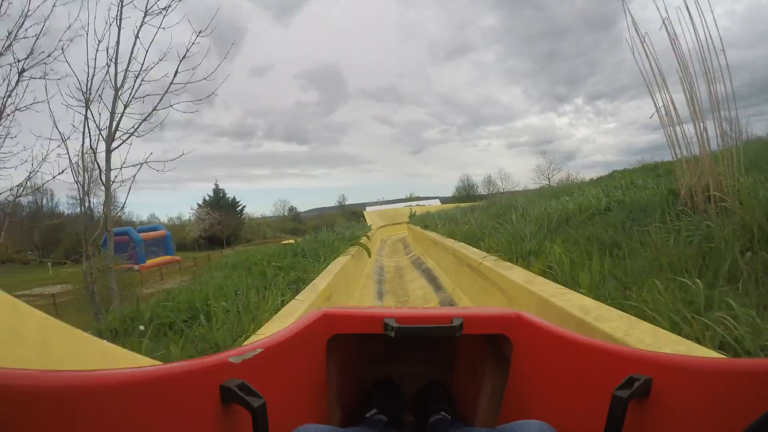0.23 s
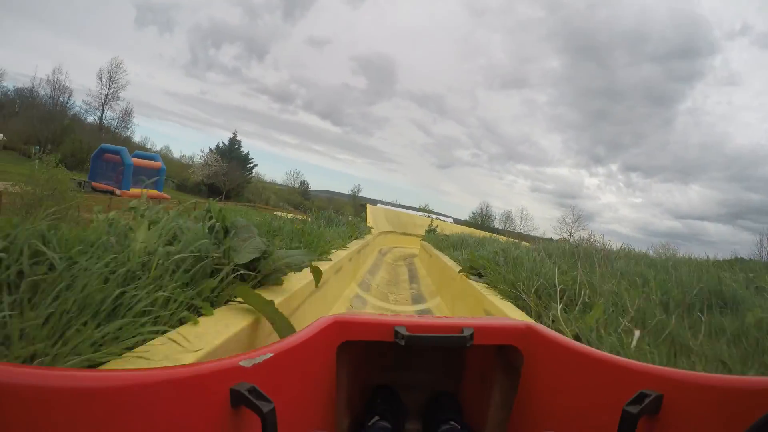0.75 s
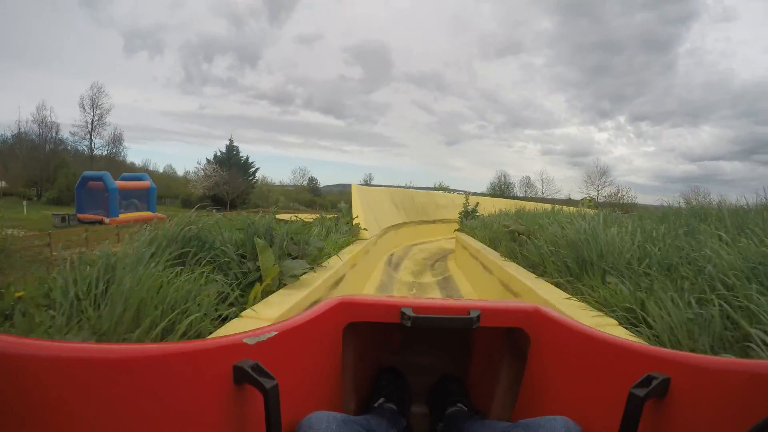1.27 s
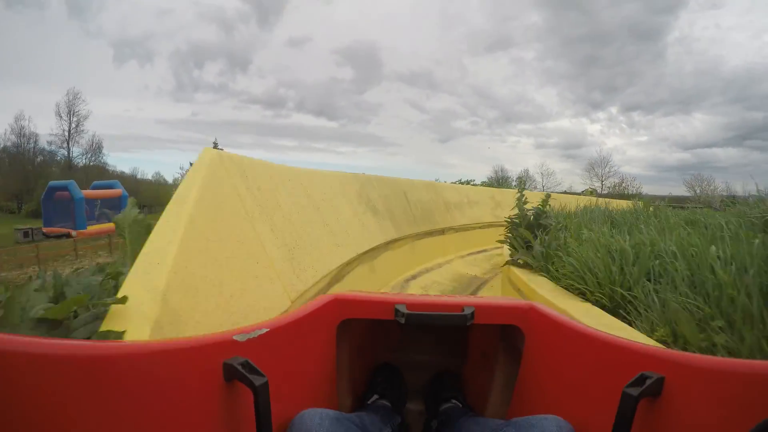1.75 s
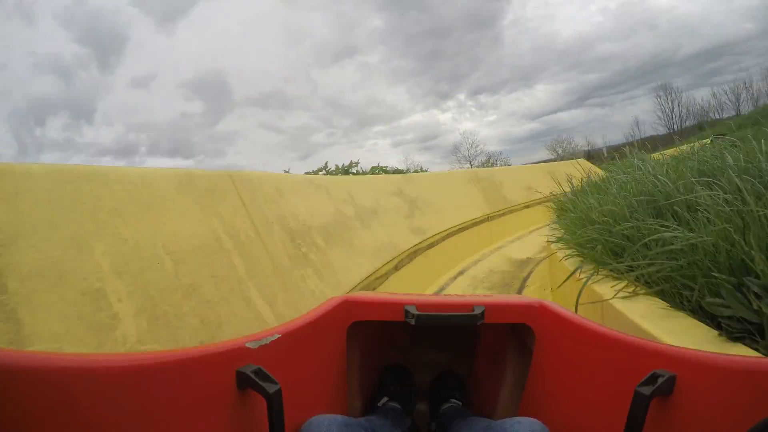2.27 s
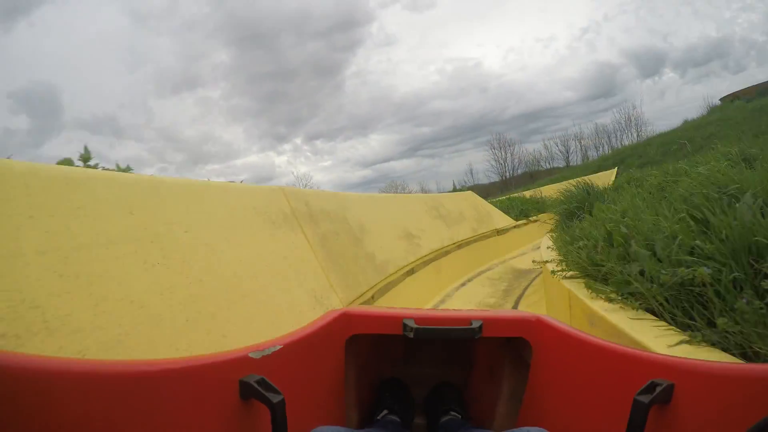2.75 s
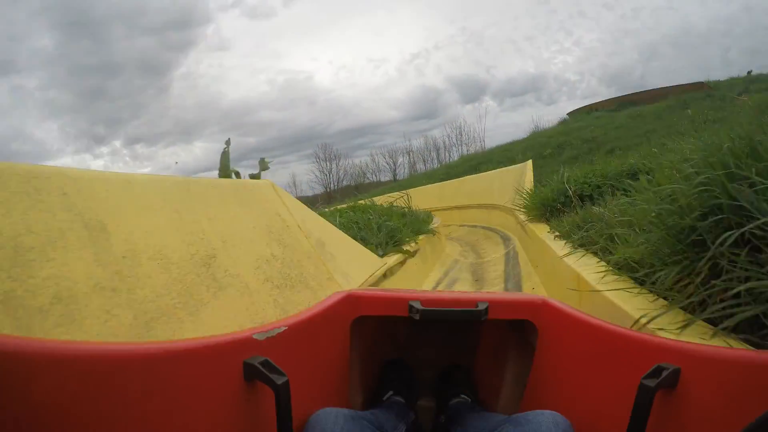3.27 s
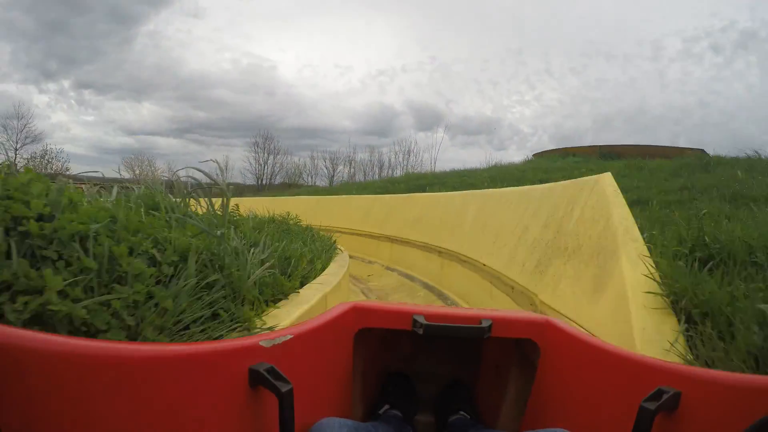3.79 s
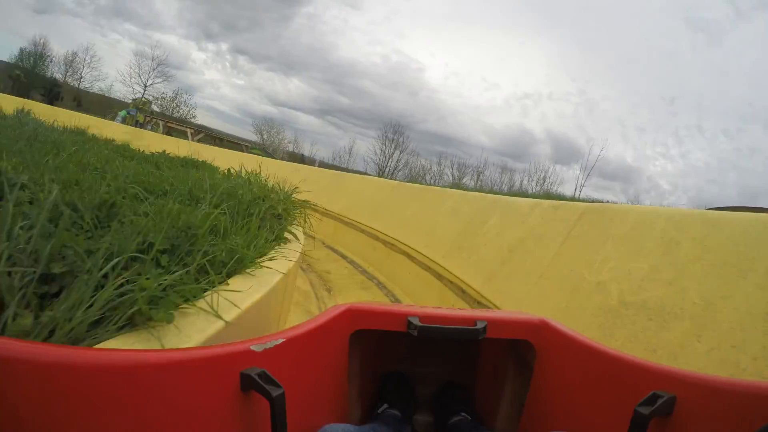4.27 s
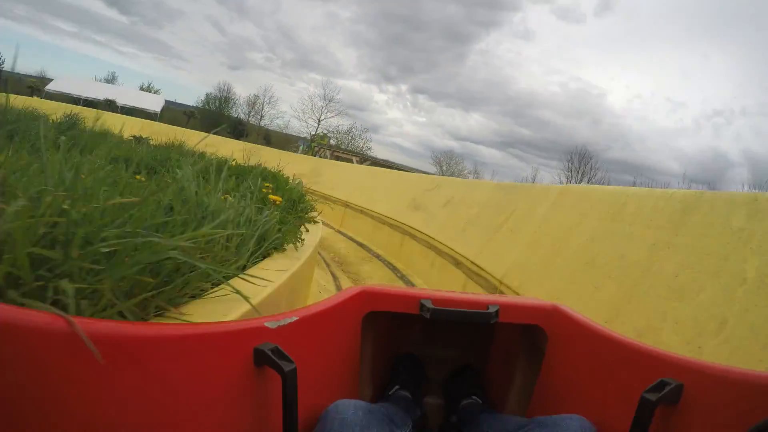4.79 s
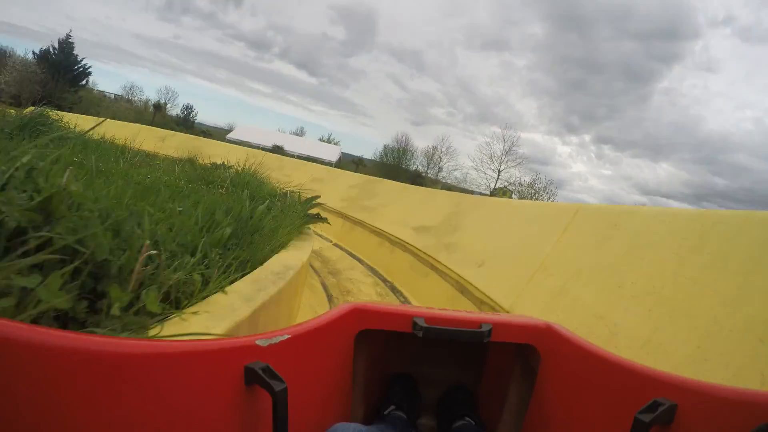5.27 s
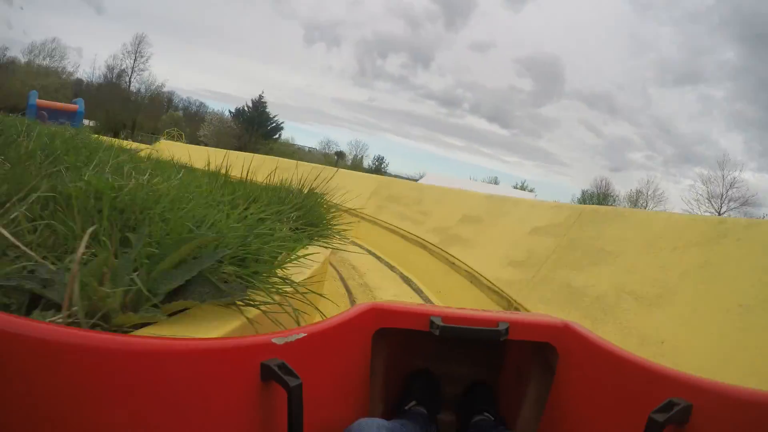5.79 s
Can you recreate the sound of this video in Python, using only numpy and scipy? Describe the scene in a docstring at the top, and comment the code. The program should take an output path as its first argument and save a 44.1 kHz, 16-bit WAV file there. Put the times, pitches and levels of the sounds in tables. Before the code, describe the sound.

A plastic sled rolls down an outdoor trough track, heard through its own body by a microphone fixed to it. The wheels make a continuous hollow roar over a deep rumble, with a faint wavering whirr. Track joints bring irregular thumps and short rattles several times a second, and loose parts click. A heavy knock comes early, and the rumble grows toward the end with a cluster of harder knocks.

```python
"""A plastic sled rolls down a moulded trough, its wheels roaring in the ringing plastic shell.
At every track joint the front and rear wheels thump and shake a rattle loose. Loose parts click,
and the hull knocks and lurches. It is all heard through the sled's body by a camera fixed to it,
whose electronics whine faintly in pulses."""
import sys
import numpy as np
from scipy import signal
from scipy.fft import rfft, irfft, next_fast_len
from scipy.io import wavfile
from scipy.ndimage import uniform_filter1d, map_coordinates

SR = 44100
rng = np.random.default_rng(int(sys.argv[2]) if len(sys.argv) > 2 else 0)


def waveform_to_disk(signal):
    """Save audio, clipped to [-1, 1], as 16-bit WAV at the path in sys.argv[1]."""
    frames = np.transpose(np.atleast_2d(signal))
    scaled = np.clip(frames, -1, 1) * 32767
    samples = np.round(scaled).astype(np.int16)
    wavfile.write(sys.argv[1], SR, samples)


N = 266805


def amp(db):
    """Turn decibels into a gain."""
    return 10 ** (np.asarray(db) / 20)


def unit(x):
    """Scale x to an average strength (rms) of 1."""
    return x / np.sqrt(np.mean(x ** 2) + 1e-20)


def tone(hz, t):
    """A sine wave over the times t."""
    return np.sin(2 * np.pi * hz * t)


def add(track, start, x):
    """Mix x into the track from start, in seconds."""
    part = track[max(round(start * SR), 0):][:len(x)]
    part += x[:len(part)]


def wobble(per_s):
    """A smooth curve through per_s random points a second."""
    return map_coordinates(rng.standard_normal(int(N * per_s / SR) + 4), [np.arange(N) * per_s / SR])


def filtered(x, response):
    """Scale each frequency in x by response(hz)."""
    size = next_fast_len(N + SR // 2)
    return irfft(rfft(x, size) * response(np.fft.rfftfreq(size, 1 / SR)), size)[..., :N]


def coloured(points):
    """Noise of strength 1, its spectrum shaped by (Hz, dB) points."""
    hz, db = np.transpose(points)
    response = lambda f: amp(np.interp(np.log(f + 1), np.log(hz + 1), db))
    return unit(filtered(rng.standard_normal(N), response))


def grit(per_s, spread_db):
    """Scattered random ticks of uneven size."""
    chance, size = rng.random((2, N))
    return unit((chance < per_s / SR) * rng.standard_normal(N) * amp(-spread_db * np.log(1 - size)))


def patchy(depth_db):
    """White noise whose strength drifts in patches of time and frequency."""
    spectra = signal.stft(rng.standard_normal(N), nperseg=1024)[2]
    patches = uniform_filter1d(rng.standard_normal(spectra.shape), size=4, axis=0)
    patches = uniform_filter1d(patches, size=5, axis=1)
    return unit(signal.istft(spectra * amp(depth_db * unit(patches)), nperseg=1024)[1][:N])


def wall(hz):
    """The share of each frequency that gets through: the thick wall stops the treble."""
    return 1 / (1 + (hz / 3300) ** 5)


# The notes the shell rings at. Each row: pitch in Hz, width in Hz, relative level in dB.
SHELL_NOTES = [(249, 31, -1.5), (424.4, 68, -1), (744, 370, -13.5), (1003, 98, -3.5), (1230, 137, -4.5),
               (1472, 58, -1), (1634, 67, -1.5), (2050, 570, -8.5), (2408, 220, -4.5), (2520, 280, -7.5),
               (3320, 570, -10), (3510, 92, 0), (4426, 500, -3.5)]
# A band where the shell is dead: centre in Hz, width in Hz, depth from 0 to 1.
DEAD_BAND = (4080, 330, .6)
def shell(x):
    """Pass x through the plastic shell, which favours its own notes."""
    def response(f):
        power = sum(amp(2 * db) * (f * width) ** 2 / ((hz * hz - f * f) ** 2 + (f * width) ** 2)
                    for hz, width, db in SHELL_NOTES)
        centre, width, depth = DEAD_BAND
        dip = 1 - depth * np.exp(-((f - centre) / width) ** 2)
        return np.sqrt(power) * dip * wall(f)
    return filtered(x, response)


def shell_ring(t, spread_db, fade_s):
    """The struck shell rings at new strengths each time, fading by 60 dB in fade_s."""
    return sum(amp(db + rng.normal(0, spread_db) - 60 * t / fade_s) * wall(hz) * tone(hz, t)
               for hz, _, db in SHELL_NOTES)


# The whine: pitch in Hz, level in dB, pulses a second, a pulse's start in seconds, share of time on.
WHINE = (14700, -76, 15, .0555, .55)
def camera_whine():
    """The camera's electronics give a faint high tone that switches steadily on and off."""
    hz, db, per_s, start, share_on = WHINE
    t = np.arange(N) / SR
    pulses = uniform_filter1d(1. * ((t - start) * per_s % 1 < share_on), size=90)
    return amp(db + 1.5 * wobble(60)) * pulses * np.sin(2 * np.pi * hz * t + .7 * wobble(40))


# Each row: time of the peak in seconds, peak level in dB, pitch in Hz, direction (only its sign counts).
LURCHES = [(0.856, -6, 39, 1), (0.95, -31, 50, 1), (1.533, -19, 45, 1), (2.104, -12, 63, 1),
           (2.498, -16, 59.5, 1), (3.564, -12.5, 74, -1), (4.487, -9, 69.6, 0.75), (4.947, -10, 39, -1),
           (5.045, -9.5, 39.7, 0.91), (5.157, -13, 36, -1.2), (5.194, -11.5, 37.3, -1),
           (5.443, -4.5, 28.7, -1), (5.521, -13, 54, -1), (5.592, -5.5, 54, -1), (5.656, -7.5, 61.6, -1),
           (5.694, -14, 40, -1), (5.933, -9, 39.6, -1)]
def hull_lurches():
    """The hull makes one heavily damped low swing, with weak swings before and after."""
    out, t = np.zeros(N), np.arange(-SR // 20, SR // 20) / SR
    for peak_time, db, hz, direction in LURCHES:
        swing = np.exp(-(2.1 * hz * t) ** 2) * np.cos(2 * np.pi * hz * t)
        add(out, peak_time + t[0], np.sign(direction) * amp(db) * swing)
    return out


# Each row: start in seconds, level in dB, ping in dB above that, direction (only its sign counts).
KNOCKS = [(0.8423, -17.5, -27, 0.9), (3.0148, -18, -44, 1), (4.4756, -13, -25, -1), (5.5123, -10, -20, 1),
          (5.5831, -4, -23.5, 1)]
def hull_knocks():
    """A hard knock bends the hull. High waves outrun low ones: a spike, then ever slower swings."""
    out, t = np.zeros(N), np.arange(SR // 30) / SR
    sweep = np.sin(160 * t ** .5) / (1 + t / .0015) * np.exp(-t / .006)
    sweep = signal.lfilter(*signal.butter(3, 2800, fs=SR), sweep)  # plastic on plastic is a little soft
    ping = amp(-60 * t / 0.0068) * (tone(9900, t) + 0.44 * tone(7200, t) + 0.13 * tone(13500, t))
    for start, db, ping_db, direction in KNOCKS:
        ring = amp(-21.5) * shell_ring(t, spread_db=2.2, fade_s=0.047)
        add(out, start, amp(db) * (np.sign(direction) * sweep + amp(ping_db) * ping + ring))
    return out


# The crack of a click. Each row: frequency in Hz, relative level in dB.
CRACK_SPECTRUM = [(1500, -120), (3000, 8), (4500, 2), (7000, -2), (10000, -13), (13500, -11), (16000, -6)]
# Each row: start in seconds, level in dB, pitch in Hz, then boosts in dB for the crack and low rings.
CLICKS = [(0.1345, -14.5, 1960, -20, 6.5), (0.584, -17.5, 2060, -31, -7), (0.9037, -15.5, 1950, -21.5, 6.5),
          (0.9137, -17, 2140, -34, 6), (1.1176, -22.5, 2570, -23.5, -16), (2.0813, -14.5, 2600, -22.5, 3),
          (2.3281, -29, 1820, -49, 17), (3.0504, -39, 2380, -30, 9), (3.2157, -33, 2570, -32, -2),
          (3.8516, -20, 2410, -24, -4), (4.4052, -24.5, 2500, -48, -20), (4.6144, -22, 1880, -26, -1),
          (4.9178, -12.5, 2570, -26.5, -3), (5.8705, -25, 2300, -33, -10)]
def loose_clicks():
    """Loose parts tap the shell: rings that swell and die in milliseconds, and a crack of treble."""
    rings, crack = np.zeros((2, N))
    t = np.arange(SR // 30) / SR
    swell = t / 0.00096 * np.exp(1 - t / 0.00093)
    for start, db, hz, crack_db, low_db in CLICKS:
        high = tone(hz, t) + .45 * tone(.78 * hz, t) + .3 * tone(1.3 * hz, t) + .12 * tone(1.75 * hz, t)
        low = tone(0.598 * hz, t) + 1.25 * tone(0.31 * hz, t) + 1.4 * tone(0.098 * hz, t)
        answer = (1 - np.exp(-t / .0005)) * shell_ring(t, spread_db=4, fade_s=0.023)
        add(rings, start, amp(db + 1.5) * swell * high)
        add(rings, start, amp(db + low_db - 11.5) * swell * low)
        add(rings, start, amp(db - 16) * answer)
        add(crack, start, amp(db + crack_db + 8.0) * swell)
    return rings + crack * coloured(CRACK_SPECTRUM)


# The bright top and the hollow body of a blow. Each row: frequency in Hz, relative level in dB.
BRIGHT_SPECTRUM = [(1500, -120), (3500, 12.5), (5000, -1.5), (7000, 2.5), (10000, -7.5), (14000, -17.5),
                   (15000, -19), (15700, -41)]
HOLLOW_SPECTRUM = [(40, -120), (120, -11.5), (250, 9.5), (420, -5.5), (550, -1.5), (720, -5.5), (950, -6.5),
                   (1500, -93), (4000, -120)]
# Wheels crossing joints and bumps. Each row: start in seconds, level in dB, thump boost in dB,
# thump pitch in Hz, bright boost in dB, hollow boost in dB, shaking time in seconds.
JOINTS = [(0.0624, -14, -0.5, 154, -9, -8, 0.035), (0.238, -15.5, -21, 109, -4, -20, 0.015),
          (0.254, -20, -10, 99.5, -16, 0.5, 0.023), (0.573, -18, -16, 164, -20, -7, 0.028),
          (0.755, -31, 2, 180, -12, -5.5, 0.063), (1.078, -19.5, -10, 176, -22, -5.5, 0.037),
          (1.2763, -31, 8.5, 197, -9, 5, 0.07), (1.4794, -30, 5, 163, -10.5, -1.5, 0.054),
          (1.7858, -24.5, -12, 173, -18, 2, 0.034), (1.9713, -24, -1.5, 177, -13.5, -6, 0.022),
          (2.194, -31.5, 0, 184, -2, -16, 0.023), (2.2895, -22.5, 7.5, 139, -11, -13, 0.043),
          (2.32, -26.5, -20, 116, -36, -14, 0.032), (2.489, -23, -4, 183, -12, -6.5, 0.02),
          (2.817, -21, 4.5, 153, -17, -6, 0.056), (2.885, -23.5, -22, 126, -4.5, -23, 0.018),
          (2.946, -14, -31, 168, -38, -5, 0.011), (3.0127, -20, -8, 177, -17, -3, 0.03),
          (3.3408, -21, 2.5, 167, -14.5, -7.5, 0.035), (3.532, -14.5, -18, 178, -9.5, -6.5, 0.032),
          (3.85, -15.5, -12, 225, -25, -2.5, 0.034), (4.03, -25, -5, 179, -8.5, 0.5, 0.044),
          (4.3445, -27, 12.5, 134, -19, 0.5, 0.035), (4.367, -21, -3, 115, -12.5, -1.5, 0.016),
          (4.4742, -16.5, -8, 100, -14, -5.5, 0.016), (4.553, -20.5, -4, 101, -14.5, -3, 0.022),
          (4.858, -23.5, 8.5, 144, -20, -9, 0.034), (4.881, -14.5, -9, 121, -19, -5.5, 0.021),
          (5.0566, -23, -9, 129, -11, -2.5, 0.035), (5.3588, -12, -1, 136.3, -9, -8.5, 0.046),
          (5.3885, -19.5, -4, 155, -8, -13, 0.024), (5.5475, -18.5, -4, 111, -12, -4.5, 0.055),
          (5.8482, -19, 4, 142, -12.5, -6.5, 0.049), (5.8666, -20.5, -14, 118, -19, -7, 0.024),
          (6.0334, -16, -12.5, 137, -13.5, -4.5, 0.028)]
def track_joints():
    """Each joint swings the hull for a few cycles and shakes everything loose for a moment."""
    thump, rattle, bright, hollow = np.zeros((4, N))
    t = np.arange(SR // 5) / SR
    swing_s, on_pitch_s, sag_per_s = .025, .011, 18
    swing = (.35 + t / swing_s) * np.exp(-(t / swing_s) ** 4)  # builds, then dies fast
    slowing_time = t * (1 + sag_per_s * (on_pitch_s - t / 2))  # makes the thump's pitch fall
    build = 1 - np.exp(-t / .002)
    for start, db, thump_db, hz, bright_db, hollow_db, shake_s in JOINTS:
        add(thump, start, amp(db + thump_db + 6) * swing * tone(hz, slowing_time))
        # shaking starts at once in the treble, builds in the shell, holds and fades
        shaking = (1 - np.exp(-t / 0.00057)) / (1 + (t / shake_s) ** 3)
        add(rattle, start, amp(db - 12.0) * shaking * build)
        add(bright, start, amp(db + bright_db - 10.5) * shaking * np.exp(-t / 0.071))
        add(hollow, start, amp(db + hollow_db - 5.0) * shaking * build)
    chatter = amp(2.2 * wobble(200))  # loose parts make the shaking grainy
    rattle *= unit(shell(rng.standard_normal(N) + 0.33 * grit(600, spread_db=5.5)))
    bright *= coloured(BRIGHT_SPECTRUM)
    hollow *= coloured(HOLLOW_SPECTRUM)
    return thump + chatter * (rattle + bright) + hollow


def aftershake(peak_s):
    """The hull keeps moving after each joint: a loudness curve that swells more for harder blows."""
    out, t = np.zeros(N), np.arange(SR // 2) / SR
    swell = (t / peak_s * np.exp(1 - t / peak_s)) ** 2
    for start, db, thump_db, *_ in JOINTS:
        add(out, start, amp(db) * np.hypot(.3, amp(thump_db)) * swell)
    return out


# The hull's deep rumble and higher drumming. Each row: frequency in Hz, relative level in dB.
RUMBLE_SPECTRUM = [(8, -13.5), (16, 5.5), (30, -2.5), (60, -8), (90, -13), (150, -27), (400, -120)]
DRUMMING_SPECTRUM = [(15, -120), (40, -9), (75, -4.5), (130, -2), (200, -6), (300, -22), (450, -19.5),
                     (800, -28), (1100, -46), (3000, -120)]
def hull_rumble(rumble_db):
    """Rough track makes the hull rumble and drum, more so just after each joint."""
    drumming_db = -35 + 0.28 * (rumble_db - rumble_db.mean())  # partly follows the rumble
    rumble_gain = amp(rumble_db) + amp(-11) * aftershake(peak_s=0.051)
    drumming_gain = amp(drumming_db) + amp(-11) * aftershake(peak_s=0.028)
    rumble = rumble_gain * amp(2.9 * wobble(18)) * coloured(RUMBLE_SPECTRUM)
    drumming = drumming_gain * amp(2.5 * wobble(20)) * coloured(DRUMMING_SPECTRUM)
    return rumble + drumming


# The wheels' own note: pitch in Hz, width in Hz.
WHEEL_NOTE = (1155, 31)
def wheel_whirr(db):
    """The wheels ring in one narrow band of noise that wavers in strength."""
    hz, width = WHEEL_NOTE
    resonance = lambda f: 1j * f * width / (hz * hz - f * f + 1j * f * width)
    whirr = unit(filtered(rng.standard_normal(N), resonance))
    return amp(db + 2.7 * wobble(11)) * whirr


# The hiss of rolling. Each row: frequency in Hz, relative level in dB.
HISS_SPECTRUM = [(2500, -120), (4200, -25), (4900, -10), (5420, 1), (5800, -4.5), (6350, 0), (7300, 0.5),
                 (8300, -6), (9500, -13.5), (10700, -13.5), (12000, -13), (14000, -16), (15000, -25),
                 (15400, -43)]
# How the ride goes. Each row: time in seconds, then the levels of rumble, roar and whirr in dB.
RIDE = [(0.0, -25, -36, -41), (0.59, -29.5, -36, -48), (0.99, -24, -35.5, -51), (1.46, -23, -37.5, -42),
        (1.79, -30, -37, -49), (2.19, -25, -35.5, -42), (2.66, -27, -36, -42.5), (2.83, -28.5, -36, -43.5),
        (3.42, -23.5, -34, -41), (3.62, -36.5, -36, -48), (3.84, -26.5, -34.5, -57), (4.09, -21, -35, -57),
        (4.46, -30, -34, -55), (4.87, -25.5, -37, -51), (5.06, -15.5, -34.5, -46.5),
        (5.51, -20.5, -35, -49.5), (5.66, -23.5, -36, -47), (6.05, -17.5, -36.5, -46)]
def rolling_wheels():
    """Rough track shakes the wheels: a roar in the shell, with rumble below, a whirr and hiss on top."""
    times, *levels = np.transpose(RIDE)
    rumble_db, roar_db, whirr_db = [np.interp(np.arange(N) / SR, times, db) for db in levels]
    roughness = wobble(25)  # moves the roar and the hiss together
    rumble = hull_rumble(rumble_db)
    flutter = amp(1.5 * roughness + 0.95 * wobble(90))
    contact = patchy(depth_db=2.0) + 0.25 * grit(400, spread_db=0.0)
    roar = amp(roar_db) * unit(shell(flutter * contact))
    hiss = amp(roar_db - 23.5 + 1.2 * roughness + 1.5 * wobble(60)) * coloured(HISS_SPECTRUM)
    return rumble + roar + wheel_whirr(whirr_db) + hiss


def scene():
    """Everything reaches one microphone through the sled's body."""
    sled = rolling_wheels() + track_joints() + loose_clicks() + hull_knocks() + hull_lurches()
    return (sled + camera_whine())[None]


def record(dry):
    """The camera fades out the highest treble and keeps nothing above its limit."""
    fade_hz, limit_hz, hz_per_db = 14950, 15720, 30
    return filtered(dry, lambda hz: (hz < limit_hz) * amp(-np.clip(hz - fade_hz, 0, None) / hz_per_db))


dry = scene()
out = record(dry)
waveform_to_disk(out)
```